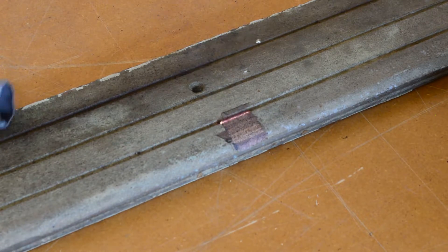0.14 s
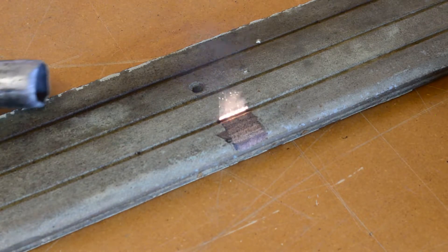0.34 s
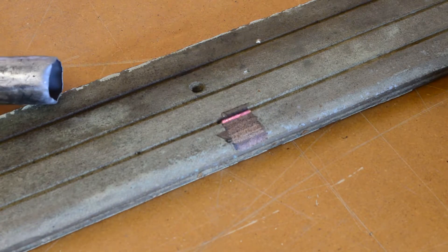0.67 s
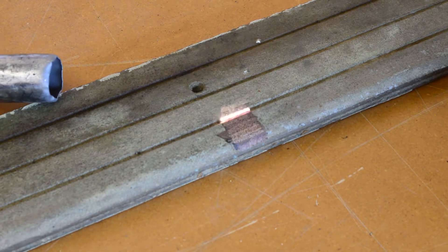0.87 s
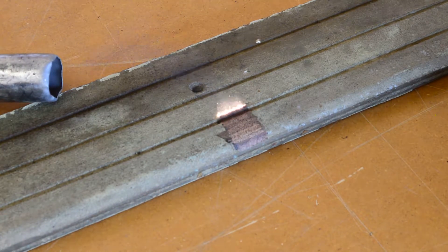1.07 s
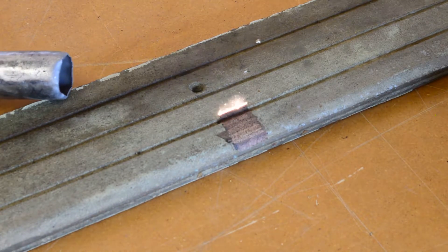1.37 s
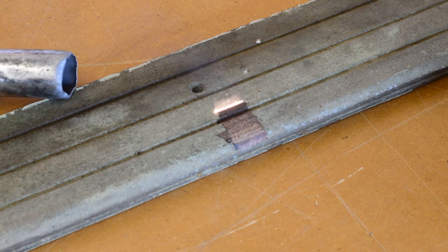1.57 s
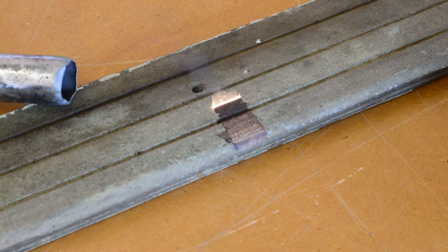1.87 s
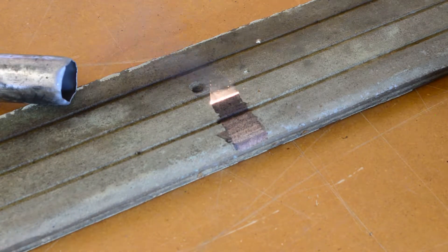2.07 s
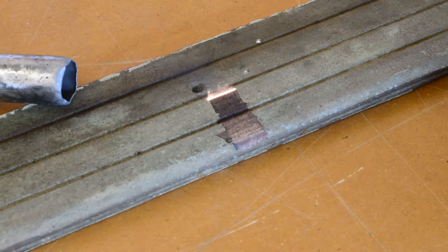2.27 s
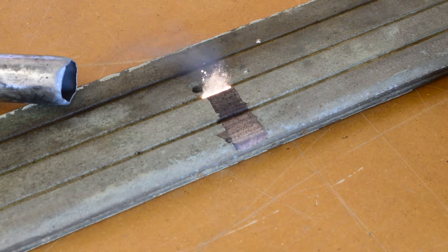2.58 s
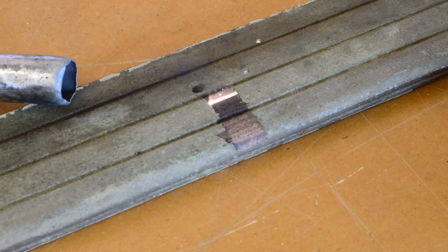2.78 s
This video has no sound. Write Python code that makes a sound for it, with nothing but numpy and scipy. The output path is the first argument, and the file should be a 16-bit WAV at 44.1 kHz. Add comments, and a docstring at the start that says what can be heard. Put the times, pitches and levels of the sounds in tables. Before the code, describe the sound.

Close microphone beside a metal rail: harsh, gritty laser buzz with sizzling spatter, one early flare, a quieter gap, then rapid uneven bursts, while a fume extractor hisses and rumbles softly beneath.

```python
"""Beside a metal rail, one close microphone: a pulsed laser strips the coating next to a fume extractor's nozzle.
From the start, random noise rushes, hisses and rumbles through the extractor; a mirror whines faintly.
The buzz of the beam, re-reading nearly the same random specks each sweep, is weak at first and soon flares.
It sinks until about 0.9 s, then comes in bright bursts to the end.
Spatter, a grainy random hiss, jumps up early, sinks back, and is strongest just before the end."""
import sys
import numpy as np
from scipy.fft import rfft, irfft
from scipy.io import wavfile
from scipy.ndimage import uniform_filter1d, minimum_filter1d, map_coordinates

SR = 44100
rng = np.random.default_rng(int(sys.argv[2]) if len(sys.argv) > 2 else 0)


def to_wav(s):
    """Save 16-bit WAV."""
    ch = np.atleast_2d(s).T  # columns
    pcm = np.round(np.clip(ch, -1, 1) * 32767)  # PCM
    wavfile.write(sys.argv[1], SR, pcm.astype(np.int16))


N = 129213  # length [samples]
SWEEP_HZ = 317.6  # full to-and-fro cycles of the beam per second


def from_db(db):
    """Decibels to gain."""
    return 10 ** (np.asarray(db) / 20)


def rms_one(x):
    """Scale to unit rms."""
    return x / np.sqrt(np.mean(x ** 2) + 1e-20)


def in_time(rows):
    """A curve's value at every sample, with straight lines between its points."""
    return np.interp(np.arange(N) / SR, *np.transpose(rows))


def coloured(x, colour, peaks):
    """Shape a sound by a broad spectrum with narrow peaks and dips on top; rms 1."""
    hz = np.fft.rfftfreq(N, 1 / SR) + 1e-3  # keeps the logarithm finite at 0 Hz
    points_hz, points_db = np.transpose(colour)
    db = np.interp(np.log(hz), np.log(points_hz), points_db)
    for centre, width, lift in peaks:
        db = db + lift / (1 + (2 * (hz - centre) / width) ** 2)
    return rms_one(irfft(rfft(x) * from_db(db), N))


def coloured_noise(colour, peaks):
    """Turbulence as random noise with a given spectrum; rms 1."""
    return coloured(rng.standard_normal(N), colour, peaks)


# Low rumble of the fan: (time [s], level [dB])
FAN_LEVEL = [(0, -38), (.35, -46), (.7, -44), (1.1, -45.5), (1.4, -41), (1.57, -61), (1.65, -52),
             (1.85, -49), (2.0, -45), (2.5, -44.5), (2.93, -46)]
# Its spectrum: (frequency [Hz], relative density [dB per Hz])
FAN_COLOUR = [(20, -23), (45, -18), (62, -5.5), (115, 2), (200, -9.5), (400, -30), (2000, -60)]
# Its resonances: (centre [Hz], width [Hz], lift [dB])
FAN_RESONANCES = [(75.4, 10, 10.5), (89.3, 9, 8)]


def fan_rumble():
    """The fan rumbles as low noise with two narrow resonances."""
    return from_db(in_time(FAN_LEVEL)) * coloured_noise(FAN_COLOUR, FAN_RESONANCES)


# Rush of air in the hose: (time [s], level [dB])
HOSE_LEVEL = [(0, -23), (.15, -22.5), (.18, -25), (.23, -22.5), (.45, -27), (.62, -22.5), (.78, -21.5),
              (.92, -23.5), (1.1, -26.5), (1.35, -26), (1.56, -28), (1.85, -27), (1.97, -25.5), (2.3, -26),
              (2.55, -25), (2.75, -27), (2.93, -28.5)]
# Its spectrum: (frequency [Hz], relative density [dB per Hz])
HOSE_COLOUR = [(20, -44), (110, -15.5), (195, -11), (270, -4.5), (400, -1.5), (560, -6), (1100, -4.5),
               (1800, -4.5), (2700, -7), (4400, -10.5), (8000, -15), (15700, -38)]
# Resonances of the hose: (centre [Hz], width [Hz], lift [dB])
HOSE_MODES = [(81, 4, 15), (88.5, 9, 6), (240.7, 11, 6), (335, 43, 6.5), (389, 16, 3), (574, 180, 4.5),
              (1020, 120, 3), (1550, 85, 4), (1775, 90, -7.5), (1988, 32, 6), (2150, 24, 9),
              (2310, 180, -1.5), (2780, 28, 8.5)]


def hose_rush():
    """Turbulent air rushes down the resonant hose."""
    return from_db(in_time(HOSE_LEVEL)) * coloured_noise(HOSE_COLOUR, HOSE_MODES)


# Hiss at the mouth of the nozzle: (time [s], level [dB])
MOUTH_LEVEL = [(0, -18.5), (.17, -21), (.28, -22.5), (.45, -23.5), (.62, -20.5), (.85, -20), (1.0, -22.5),
               (1.13, -25), (1.2, -23), (1.32, -25), (1.57, -27), (1.65, -24), (1.85, -25), (1.96, -21),
               (2.1, -24.5), (2.22, -21), (2.4, -23.5), (2.55, -22.5), (2.93, -25.5)]
# Its spectrum: (frequency [Hz], relative density [dB per Hz])
MOUTH_COLOUR = [(1500, -21), (2600, -9.5), (3400, -4), (4400, 0), (5200, -0.5), (6100, -11.5), (7000, -3.5),
                (8700, -6), (9700, -3.5), (11300, -10.5), (13000, -17), (15700, -33)]
# Pipe resonances of the nozzle: (centre [Hz], width [Hz], lift [dB])
MOUTH_RESONANCES = [(3160, 140, 7), (3680, 94, 8.5), (4250, 270, 4), (4640, 140, -2.5), (4715, 50, 8.5),
                    (5100, 250, 4), (6750, 170, 5.5), (8900, 150, 3), (11800, 220, 6)]


def nozzle_hiss():
    """Air hisses over the mouth of the nozzle, coloured by its pipe resonances."""
    return from_db(in_time(MOUTH_LEVEL)) * coloured_noise(MOUTH_COLOUR, MOUTH_RESONANCES)


# Faint whine of the scanning mirror: (multiple of the sweep rate, level [dB rms])
WHINE_PARTIALS = [(7, -47), (8, -48), (13, -45), (15, -45), (16, -46)]


def mirror_whine():
    """The scanning mirror whines steadily at multiples of the sweep rate."""
    sweeps = np.arange(N) / SR * SWEEP_HZ
    whine = np.zeros(N)
    for multiple, db in WHINE_PARTIALS:
        start = rng.random()
        sine = np.sin(2 * np.pi * (multiple * sweeps + start))
        whine += from_db(db) * np.sqrt(2) * sine  # a sine of rms 1 peaks at root 2
    return whine


# Loose spatter before the treble is set: (time [s], hiss level [dB])
SPATTER_LEVEL = [(0, -33), (.19, -27.5), (.25, -19.5), (.36, -30), (.44, -29), (.6, -28), (.865, -25),
                 (.89, -32), (1.0, -25), (1.14, -26), (1.25, -23.5), (1.8, -26), (2.0, -23.5),
                 (2.12, -26.5), (2.25, -24), (2.5, -21), (2.68, -20.5), (2.77, -23), (2.83, -17.5),
                 (2.93, -41)]
# Its spectrum: (frequency [Hz], relative density [dB per Hz])
SPATTER_SPECTRUM = [(1000, -25), (3000, -11), (4700, -4.5), (6100, -6.5), (7300, -2), (8800, -3),
                    (9800, -6), (11400, -4.5), (12700, -11), (14400, -17), (15700, -23)]


def spatter(grain_db=2.5):
    """Loose particles burst at random: a grainy hiss that does not repeat."""
    unevenness = rms_one(uniform_filter1d(rng.standard_normal(N), size=14))
    grainy_noise = rng.standard_normal(N) * from_db(grain_db * unevenness)
    return from_db(in_time(SPATTER_LEVEL)) * coloured(grainy_noise, SPATTER_SPECTRUM, [])


SPOTS_PER_SWEEP = 139


def surface(along, across):
    """Read a smooth random surface along the path of the beam; rms 1."""
    grid = rng.standard_normal((SPOTS_PER_SWEEP * 4, SPOTS_PER_SWEEP + 1))
    return rms_one(map_coordinates(grid, [along, across], order=3, mode="grid-wrap"))


# Uneven thickness of the coating: rms [dB], size along the sweep [spots], along the rail [specks]
PATCHY_DB, PATCH_SIZE_SPOTS, PATCH_LENGTH_SPECKS = 0.5, 8.33, 2.0
# A second set of specks: relative strength, and how many times faster they pass along the rail
FINE_SHARE, FINE_RATIO = 0.26, 2.6
# Weakening where the beam turns round; excess of the stronger stroke (both relative to 1)
TURN_DIP, ONE_SIDED = 0.18, 0.41
# Wavering of the bite: rms [dB], random points passed per second
FLICKER_DB, FLICKER_RATE = 1.5, 34.66
# How strongly the beam bites, before flicker and treble: (time [s], buzz level [dB])
BITE_LEVEL = [(0, -23), (.2, -25), (.25, -18), (.28, -20), (.305, -13), (.35, -13.5), (.41, -18.5),
              (.45, -29), (.57, -21.5), (.65, -26.5), (.865, -26.5), (.89, -13.5), (.945, -18), (.968, -14),
              (.985, -19.5), (1.035, -13), (1.09, -20.5), (1.15, -17), (1.175, -33), (1.215, -21),
              (1.245, -11.5), (1.265, -13.5), (1.3, -23), (1.35, -14), (1.43, -15), (1.46, -13.5),
              (1.51, -15), (1.53, -18), (1.547, -13), (1.575, -22.5), (1.635, -12), (1.69, -17),
              (1.725, -15.5), (1.81, -20.5), (1.86, -21.5), (1.97, -20), (2.04, -14.5), (2.085, -24.5),
              (2.16, -21.5), (2.21, -15.5), (2.26, -23.5), (2.3, -15), (2.4, -21), (2.52, -21), (2.59, -17),
              (2.66, -21), (2.71, -14.5), (2.76, -20.5), (2.82, -15.5), (2.93, -13.5)]
# Creep of the scan line along the rail, faster is rougher: (time [s], speed [specks per s])
LINE_SPEED = [(0, 101), (.25, 100), (.32, 34), (.55, 60), (.89, 139), (1.05, 30), (1.3, 32.5), (1.65, 48),
              (2.1, 60.3), (2.58, 60.6), (2.85, 148)]
# Spectrum of the ablation: (frequency [Hz], relative density [dB per Hz])
BUZZ_SPECTRUM = [(300, -35), (2000, -15.5), (3900, -14.5), (5200, -9), (6000, -5.5), (7400, -3), (8500, 2),
                 (10000, 0), (11400, -2), (12700, -9), (14400, -20), (15700, -21)]
# Stronger and weaker harmonics of the sweep in the buzz: (centre [Hz], width [Hz], lift [dB])
SWEEP_HARMONICS = [(4765, 110, 6.5), (5400, 200, 3.5), (6660, 160, 3.5), (8255, 140, 2.5), (8570, 140, 1),
                   (8890, 160, 1), (10160, 100, 0.5), (10475, 160, -8), (10790, 93, 2.5), (11430, 140, -3),
                   (13980, 200, 3)]


def buzz():
    """Every sweep crosses almost the same specks; the pattern changes as the line advances."""
    time = np.arange(N) / SR
    phase = time * SWEEP_HZ % 1
    along = np.cumsum(in_time(LINE_SPEED)) / SR
    across = phase * SPOTS_PER_SWEEP
    patches = surface(along / PATCH_LENGTH_SPECKS, across / PATCH_SIZE_SPOTS)
    thickness = from_db(PATCHY_DB * patches)
    turning = TURN_DIP * np.cos(2 * np.pi * 2 * phase)
    lopsided = ONE_SIDED * np.sin(2 * np.pi * phase)
    stroke = 1 - turning - lopsided
    specks = surface(along, across) + FINE_SHARE * surface(along * FINE_RATIO, across)
    crackle = coloured(specks * thickness * stroke, BUZZ_SPECTRUM, SWEEP_HARMONICS)
    # level the crackle over about six sweeps, so that the bite sets the loudness
    power = uniform_filter1d(crackle ** 2, size=834)
    even = crackle / np.sqrt(power + 1e-9)
    flicker = surface(time * FLICKER_RATE, np.zeros(N))
    return from_db(in_time(BITE_LEVEL) + FLICKER_DB * flicker) * even


TREBLE_HZ = 10500  # where the treble begins
# Treble of the laser's sound: (time [s], gain [dB])
TREBLE_GAIN = [(0, 0), (.3, -1.5), (.45, 0), (.8, -4), (.9, 1), (1.0, 2), (1.15, 1.5), (1.25, -5),
               (1.35, -5), (1.5, -1.5), (1.65, -2.5), (1.85, 1), (1.97, -4), (2.04, 5), (2.2, -1),
               (2.45, -2), (2.6, -1), (2.93, -2.5)]


def laser():
    """Buzz and spatter together; the treble swells and fades along the coating."""
    ablation = buzz() + spatter()
    hz = np.fft.rfftfreq(N, 1 / SR)
    lower = irfft(rfft(ablation) / (1 + (hz / TREBLE_HZ) ** 16), N)
    treble = ablation - lower
    return lower + from_db(in_time(TREBLE_GAIN)) * treble


def scene():
    """Extractor, mirror and laser at one close microphone, the same in both channels."""
    extractor = fan_rumble() + hose_rush() + nozzle_hiss()
    return np.tile(extractor + mirror_whine() + laser(), (2, 1))


PEAK_LIMIT = 0.92  # of full scale
CUTOFF_HZ = 15750


def record(dry):
    """A fast limiter holds the highest peaks down; the top is cut steeply."""
    needed_gain = np.minimum(1, PEAK_LIMIT / (np.abs(dry) + 1e-9))
    held_gain = minimum_filter1d(needed_gain, size=45)  # about 1 ms
    limited = dry * uniform_filter1d(held_gain, size=45)
    hz = np.fft.rfftfreq(N, 1 / SR)
    return irfft(rfft(limited) / np.sqrt(1 + (hz / CUTOFF_HZ) ** 1200), N)


dry = scene()
out = record(dry)
to_wav(out)
```